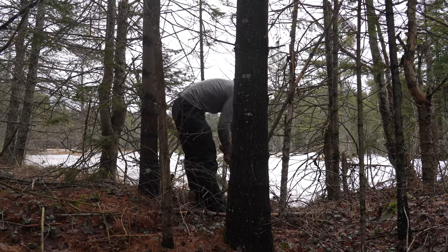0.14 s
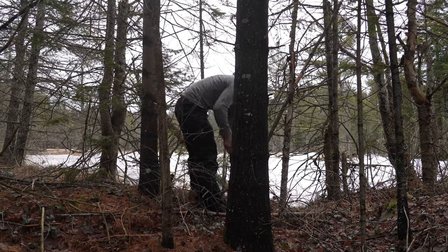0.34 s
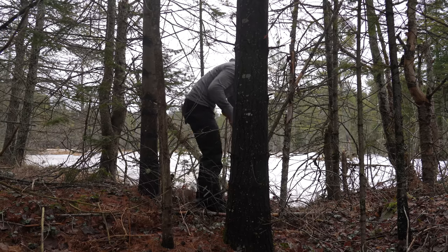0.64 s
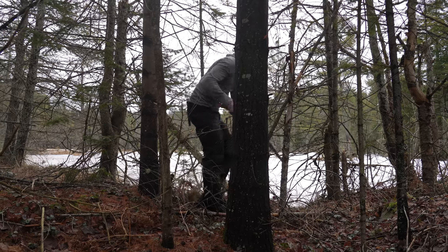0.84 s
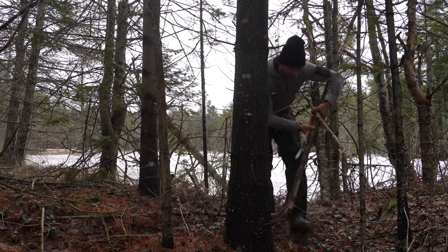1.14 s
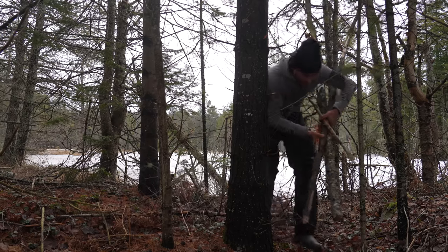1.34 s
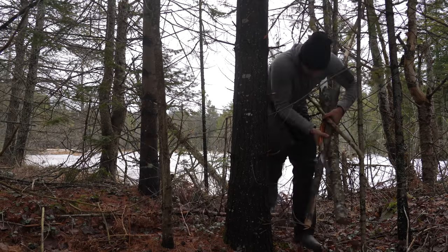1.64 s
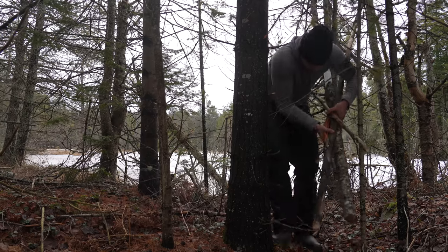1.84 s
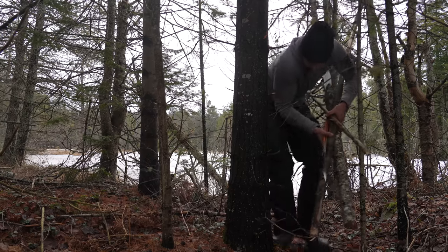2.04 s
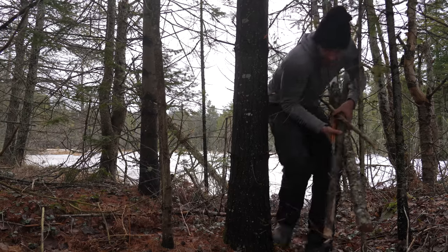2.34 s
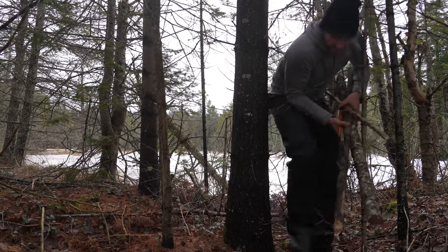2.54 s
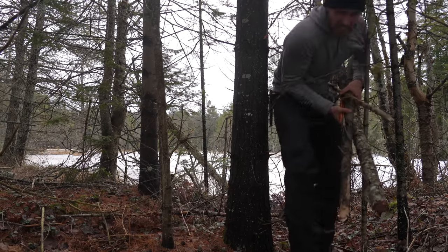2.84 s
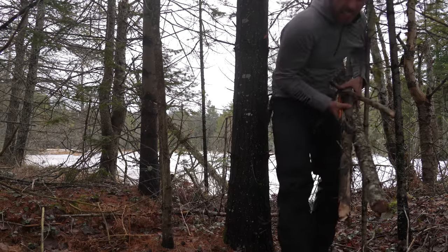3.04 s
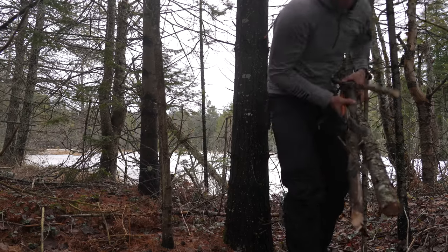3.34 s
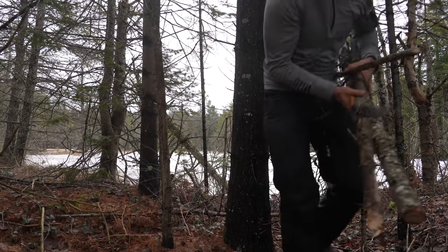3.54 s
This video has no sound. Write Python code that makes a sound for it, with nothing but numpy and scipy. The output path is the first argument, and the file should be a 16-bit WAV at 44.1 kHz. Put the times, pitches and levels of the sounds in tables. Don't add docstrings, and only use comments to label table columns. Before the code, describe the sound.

Dry branches dragged through leaves and brush: an opening rush with bumps and stick knocks, a brief lull with scattered distant snaps, then increasingly close, sharp cracks. Outdoor woods, short tree echoes, small camera microphone.

```python
import sys
import numpy as np
from scipy import signal
from scipy.io import wavfile
from scipy.ndimage import uniform_filter1d

SR = 44100
rng = np.random.default_rng(int(sys.argv[2]) if len(sys.argv) > 2 else 0)


def gain_from_db(level_db):
    decades = np.asarray(level_db, float) / 20
    return 10 ** decades


def unload_audio(sound):
    columns = np.transpose(np.atleast_2d(sound))
    steps = np.round(np.clip(columns, -1, 1) * 32767)
    wavfile.write(sys.argv[1], SR, steps.astype(np.int16))


N = 163170


def evened(x):
    return x / np.sqrt(np.mean(x ** 2) + 1e-20)


def read(points, hz):
    f, value = np.transpose(points)
    return np.interp(np.log(hz + 1), np.log(f + 1), value)


def add(mix, s, sound):
    part = mix[max(round(s * SR), 0):][:len(sound)]
    part += sound[:len(part)]


def colour(x, points):
    log_gain = np.log(gain_from_db(read(points, abs(np.fft.fftfreq(4096, 1 / SR)))))
    response = np.exp(np.conj(signal.hilbert(log_gain)))
    impulse = np.fft.ifft(response).real[:2048]
    return signal.oaconvolve(x, impulse / np.linalg.norm(impulse))[:len(x)]


def resonate(x, hz, width):
    turn = np.exp(2j * np.pi * hz * np.arange(len(x)) / SR)
    r = np.exp(-np.pi * width / SR)
    return 2 * (turn * signal.lfilter([1 - r], [1, -r], x / turn)).real


# t/s, leaves level/dB, brush level/dB, ground level/dB
DRAG_EFFORT = [(0, -33, -31, -28), (.2, -36.5, -37.5, -33.5), (.29, -33.5, -47.5, -40.5),
               (.4, -52, -50.5, -55), (.75, -50.5, -49.5, -54.5), (1.05, -36.5, -36.5, -37),
               (1.25, -33, -34.5, -38), (1.5, -35, -29.5, -45.5), (1.75, -41.5, -39.5, -50),
               (1.92, -35.5, -34.5, -45), (2.18, -40, -39, -46), (2.23, -33, -31.5, -43),
               (2.45, -38, -41, -57), (2.66, -42, -38, -54), (2.8, -41.5, -39, -47),
               (3.05, -35.5, -34, -45), (3.7, -35, -33.5, -50)]


def drag(column):
    t, rows = np.arange(N) / SR, np.array(DRAG_EFFORT)
    lull_s, fade_s, lull_db = 0.135, 0.13, -19.5
    lull = np.clip(1 - (lull_s - t) / fade_s, 0, 1) * (t < lull_s)
    return gain_from_db(np.interp(t, rows[:, 0], rows[:, column]) + lull_db * lull)


def random_pops(per_s, spread_db, limit):
    size = gain_from_db(spread_db * np.minimum(rng.exponential(1, N), limit))
    return size * (rng.random(N) < per_s / SR)


def rustle(points, per_s, spread_db, grain_s, hiss_db, patch_db):
    size = random_pops(per_s, spread_db, limit=3)
    bursts = signal.oaconvolve(size ** 2, np.exp(-np.arange(2000) / (grain_s * SR)))[:N]
    power = abs(bursts) / bursts.mean() + gain_from_db(2 * hiss_db)
    hz, t, z = signal.stft(np.sqrt(power) * rng.standard_normal(N), SR, nperseg=256)
    patches = uniform_filter1d(rng.standard_normal(z.shape), size=22, axis=0)
    patches = evened(uniform_filter1d(patches, size=7, axis=1))
    noise = signal.istft(z * gain_from_db(patch_db * patches), SR, nperseg=256)[1][:N]
    return evened(colour(noise, points))


# f/Hz, level/dB
LEAF_TONE = [(350, -26), (700, -17), (2700, -0.5), (6500, -6), (10500, -12.5), (14000, -14), (16000, -13)]


def leaves():
    sound = rustle(LEAF_TONE, per_s=230.0, spread_db=5.5, grain_s=0.003, hiss_db=6.0, patch_db=3.0)
    return drag(1) * sound


# f/Hz, level/dB
BRUSH_TONE = [(60, -14.5), (250, -4.5), (500, 0.5), (1600, -2.5), (4000, -15), (8000, -32)]


def brush():
    sound = rustle(BRUSH_TONE, per_s=260., spread_db=6.5, grain_s=0.016, hiss_db=-8.5, patch_db=0.6)
    return drag(2) * sound


# f/Hz, level/dB
GROUND_TONE = [(20, 11.5), (50, -2), (150, -1.5), (300, -5), (700, -42)]


def ground():
    sound = rustle(GROUND_TONE, per_s=30., spread_db=2.5, grain_s=.02, hiss_db=1., patch_db=1.2)
    return drag(3) * sound


def crackle():
    size = random_pops(per_s=350., spread_db=4.5, limit=4)
    kind, out = rng.integers(0, 16, N), np.zeros(N)
    for k, hz in enumerate(np.geomspace(600., 7000., num=16)):
        cycles = np.arange(800) / SR * hz
        pop = np.sin(2 * np.pi * cycles) * gain_from_db(-60 * cycles / 9.5)
        out += signal.oaconvolve(size * (kind == k), pop)[:N]
    return gain_from_db(-5.5) * drag(1) * evened(out)


def pats(rows, rise_cycles, ring_cycles, rough):
    out = np.zeros(N)
    for s, db, hz in rows:
        cycles = np.arange(8000) / SR * hz
        decay = gain_from_db(db - 60 * np.maximum(cycles - rise_cycles, 0) / ring_cycles)
        shape = np.minimum(cycles / rise_cycles, 1) * decay
        grit = evened(resonate(resonate(rng.standard_normal(len(cycles)), hz, hz), hz, hz))
        add(out, s, shape * (np.sin(2 * np.pi * cycles) + rough * grit))
    return out


# t/s, peak level/dB, f/Hz
GROUND_BUMPS = [(.008, -34, 170), (.032, -28.5, 140.5), (.085, -33, 72), (.15, -36.5, 80), (.385, -29, 384),
                (.816, -37, 282), (1.052, -27, 143), (1.097, -23.5, 305), (1.127, -21.5, 242),
                (1.198, -20, 299), (1.212, -27, 103), (1.25, -33, 150), (1.495, -33, 187), (1.5, -22, 350),
                (1.59, -34, 218), (2.21, -34, 320), (2.28, -30, 232), (3.518, -28, 410), (3.638, -30, 295)]


def bumps():
    return gain_from_db(-3.) * pats(GROUND_BUMPS, rise_cycles=1.35, ring_cycles=17.3, rough=0.59)


def trees(x):
    at = np.arange(80, 9000, 22)
    echo = np.zeros(9100)
    fade = gain_from_db(-60 * at / SR / 0.1)
    echo[at + rng.integers(0, 22, len(at))] = rng.choice([-1., 1.], len(at)) * fade
    return gain_from_db(-14) * signal.oaconvolve(x, echo / np.linalg.norm(echo))[:N]


def struck_wood(rows, rise_s, t60, rough, second, second_db):
    out, t = np.zeros(N), np.arange(6000) / SR
    for s, db, hz in rows:
        rise = np.sin(np.pi / 2 * np.minimum(t / rise_s, 1)) ** 2
        shape = rise * gain_from_db(db - 60 * np.maximum(t - rise_s, 0) / t60)
        grit = rng.standard_normal(len(t))
        for _ in range(3):
            grit = resonate(grit, hz, hz)
        tone = np.sin(2 * np.pi * hz * t) + gain_from_db(second_db) * np.sin(2 * np.pi * hz * second * t)
        add(out, s, shape * (tone + rough * evened(grit)))
    return out


# t/s, peak level/dB, f/Hz
STICK_KNOCKS = [(0.03, -27.5, 390), (0.148, -18.5, 374), (0.212, -24.5, 253), (0.271, -20, 420),
                (0.385, -31.5, 544), (1.132, -17, 478), (1.293, -15.5, 708), (2.21, -30, 607),
                (2.255, -27, 680), (2.657, -29, 460), (2.778, -19, 405), (2.831, -19, 396),
                (2.882, -22, 424), (2.892, -23, 445), (2.916, -19.5, 697), (2.929, -19, 456),
                (3.004, -25, 442), (3.156, -22.5, 650), (3.346, -19.5, 780)]


def knocks():
    return struck_wood(STICK_KNOCKS, rise_s=0.0047, t60=.022, rough=.33, second=2.3, second_db=-16)


# t/s, peak level/dB
BOOT_STEPS = [
    (0.098, -48),
    (1.292, -21),
    (1.919, -29.5),
    (2.283, -29),
    (3.186, -47),
]


def steps():
    out, t = np.zeros(N), np.arange(12000) / SR
    for s, db in BOOT_STEPS:
        earth = evened(resonate(rng.standard_normal(len(t)), 96.0, 150.0))
        push = np.sin(2 * np.pi * 54 * t) + 1.3 * earth
        add(out, s, push * np.minimum(t / 0.0063, 1) * gain_from_db(db - 7.5 - 60 * t / 0.22))
    return out


# f/Hz, level/dB
CRACK_TONE = [(100, -56), (1000, -14.5), (4000, 14.5), (9000, 5), (16000, -1.5)]
# f/Hz, level/dB
WOOD_TONE = [(60, -68), (500, 4), (1100, 2.5), (2200, 2.5), (4500, -9), (9000, -19.5)]


def snaps(rows, rise_s, splinter_db):
    crack, fizz, wood, t = np.zeros(N), np.zeros(N), np.zeros(N), np.arange(8000) / SR
    lag_s = 0.001006
    head, rise = gain_from_db(-60 * t / 0.0031), np.minimum((t + 1 / SR) / rise_s, 1)
    for s, crack_db, wood_db, t60, fizz_db in rows:
        crack_noise, wood_noise, flutter = rng.standard_normal((3, len(t)))
        ragged = 2.35 * evened(uniform_filter1d(flutter, 50))
        tail = gain_from_db(-60 * t / np.clip(t60, .01, .4) + ragged)
        crack_noise[:12] = np.sign(crack_noise[:12])
        split = rise * crack_noise * (0.65 * head ** 4 + head + gain_from_db(splinter_db) * tail)
        add(crack, s + lag_s, split * gain_from_db(crack_db - 10.0))
        add(fizz, s + lag_s, split * gain_from_db(fizz_db + 6.0))
        burst = rise * wood_noise * (head ** .5 + gain_from_db(-9.5) * tail)
        ring = sum(resonate(burst, hz, 394.0) for hz in rng.uniform(980, 3140, 4))
        add(wood, s + lag_s, gain_from_db(wood_db - 1) * (burst + 0.97 * ring))
    low = signal.butter(3, 9800, "low", fs=SR, output="sos")
    high = signal.butter(3, 9800, "high", fs=SR, output="sos")
    bright = signal.sosfilt(low, crack) + signal.sosfilt(high, fizz)
    return colour(bright, CRACK_TONE) + colour(wood, WOOD_TONE)


# t/s, crack peak level/dB, wood level/dB, splinter t60/s
FAR_TWIGS = [(0.1357, -8, -20, 0.11), (0.227, -24, -30, 0.26), (0.2549, -9.5, -45, 0.13),
             (0.5065, -15, -26, 0.094), (0.5782, -20.5, -28.5, 0.1), (0.8172, -15.5, -27, 0.12),
             (0.9918, -15, -27.5, 0.12), (1.0085, -17.5, -30, 0.36), (1.0957, -12.5, -35, 0.16),
             (1.1074, -15.5, -40, 0.068), (1.1274, -16, -23, 0.21), (1.216, -6, -16, 0.18),
             (1.2952, -17, -15.5, 0.035), (1.4016, -4, -35, 0.015), (1.5147, -10.5, -23.5, 0.085),
             (1.551, -10, -22.5, 0.12), (1.6406, -10, -25, 0.075), (1.6527, -6.5, -27, 0.056),
             (1.706, -3, -29, 0.043), (1.749, -18.5, -35, 0.07), (1.777, -20.5, -42, 0.08),
             (1.7904, -17, -38, 0.05), (1.8067, -16, -26, 0.068), (1.861, -18, -30.5, 0.24),
             (1.8845, -10, -27.5, 0.15)]


def far_snaps():
    rows = [(*row, row[1] - 19.) for row in FAR_TWIGS]
    early = snaps(rows[:6], rise_s=0.001, splinter_db=-3.5)
    return early + snaps(rows[6:], rise_s=.0001, splinter_db=-7.0)


# t/s, peak level/dB, f/Hz
STICK_CLACKS = [(0.2244, -25.5, 3930), (0.2723, -21.5, 2130), (0.307, -25.5, 1510), (0.3279, -27.5, 2720),
                (0.4375, -34, 2430), (0.4634, -26, 3110), (0.479, -27, 3020), (0.506, -27.5, 1420),
                (0.5794, -45, 2340), (0.676, -33.5, 2340), (0.7203, -34.5, 2770), (0.762, -32.5, 2680),
                (0.7744, -33.5, 2300), (0.922, -30.5, 1450), (1.2451, -20.5, 1950), (1.2785, -24, 1900)]


def clacks():
    return struck_wood(STICK_CLACKS, rise_s=0.0017, t60=.027, rough=.6, second=.7, second_db=-6)


# t/s, peak level/dB, f/Hz
BARK_TICKS = [(.4385, -22, 3970), (.688, -33, 2500), (1.201, -27, 2100), (1.402, -12, 975),
              (1.475, -22, 900), (1.493, -15, 6000), (1.515, -13, 1180), (1.522, -18, 1120),
              (1.54, -20, 666), (1.6395, -17.5, 2630), (1.736, -20, 3400), (1.832, -26, 1880),
              (1.9965, -8, 1380), (2.026, -17.5, 1080), (2.08, -16, 3480), (2.105, -22, 1310),
              (2.2, -20, 1820), (2.211, -20, 400), (2.553, -32, 1590), (2.683, -29, 3390),
              (2.808, -28, 1260), (3.0425, -6, 8500), (3.085, -15.5, 870), (3.107, -7, 1210),
              (3.191, 6, 8300), (3.23, -24, 700), (3.644, -20, 840)]


def ticks():
    return pats(BARK_TICKS, rise_cycles=0.47, ring_cycles=7.9, rough=0.43)


# t/s, peak level/dB, f/Hz
FRACTURE_SPIKES = [(.9925, -7, 12600), (1.0095, -7.5, 8500), (1.217, -6, 8950), (1.4025, -6, 12500),
                   (1.515, -2, 12600), (1.6395, -12, 11900), (1.642, -11, 11900), (1.654, -4, 9000),
                   (1.7068, -19, 12400), (2.0198, -10, 12500), (2.2835, -4, 12200), (2.699, -20, 12700),
                   (2.8625, -10, 13100), (2.9315, -5, 13300), (3.0395, 9, 12900), (3.116, -15.5, 11000),
                   (3.1755, 1, 12400), (3.191, -9, 13000), (3.318, -4.5, 12200)]


def spikes():
    return pats(FRACTURE_SPIKES, rise_cycles=0.42, ring_cycles=6.6, rough=0.24)


# t/s, crack peak level/dB, wood level/dB, fizz above 10 kHz level/dB
NEAR_TWIGS = [(1.9968, -45, -19, -46), (2.019, 1, -17, -30), (2.0941, -12, -27, -27), (2.2, -23, -31, -28),
              (2.2826, -4, -18.5, -10), (2.304, -15, -29, -31), (2.6829, -11, -48, -29),
              (2.6985, -7, -24, -18), (2.7742, -18.5, -43, -33), (2.8622, -2.5, -20, -24),
              (2.9158, -23, -19.5, -36), (2.9303, -6, -18.5, -8.5), (3.017, -14, -25, -24),
              (3.0385, 3.5, -20.5, -12), (3.043, -19, -22, -26), (3.0848, -6.5, -23, -25),
              (3.0976, -12, -27, -41), (3.107, -12, -19, -49), (3.1156, -7, -16.5, -44),
              (3.1747, -3.5, -17, -12.5), (3.1898, -7, -10, -7), (3.198, -31, -43, -36),
              (3.3165, -3, -23.5, -8), (3.3307, 1, -52, -12), (3.4381, -14, -49, -17),
              (3.5215, -12, -26, -39), (3.654, -18, -31, -26)]


def near_snaps():
    rows = [(s, crack_db, wood_db, .045, fizz_db) for s, crack_db, wood_db, fizz_db in NEAR_TWIGS]
    return snaps(rows, rise_s=.0001, splinter_db=-10.5)


def scrape():
    start_s, end_s = 2.94, 3.15
    u = np.clip((np.arange(N) / SR - start_s) / (end_s - start_s), 0, 1)
    note = evened(resonate(rng.standard_normal(N), 1660, 110.0))
    return gain_from_db(-35) * np.sin(np.pi * u) * note


# t/s, peak level/dB, f/Hz
BRANCH_BREAK = [
    (3.1912, -10, 435),
]


def branch_break():
    return struck_wood(BRANCH_BREAK, rise_s=0.00045, t60=0.021, rough=1.0, second=1.74, second_db=0.5)


def scene():
    drag_bed = leaves() + brush() + ground()
    small = crackle() + bumps() + ticks() + spikes()
    hits = knocks() + far_snaps() + clacks() + near_snaps() + branch_break()
    echoed = hits + small
    return (echoed + trees(echoed) + drag_bed + steps() + scrape())[None]


def band_limit(x):
    return signal.sosfilt(signal.butter(12, 16490, fs=SR, output="sos"), x)


# f/Hz, width/Hz, level/dB
CAPSULE = [(8280, 1090, 3), (12800, 1170, 3)]


def record(dry):
    x = dry[0] + sum(gain_from_db(db) * resonate(dry[0], hz, width) for hz, width, db in CAPSULE)
    x = signal.sosfilt(signal.ellip(10, .3, 38, 15750, fs=SR, output="sos"), x)
    x = signal.sosfilt(signal.butter(2, 42, "high", fs=SR, output="sos"), x)
    mix = np.clip(gain_from_db(-4.5) * x, -1, 1)[None]
    return band_limit(mix)


dry = scene()
out = record(dry)
unload_audio(out)
```